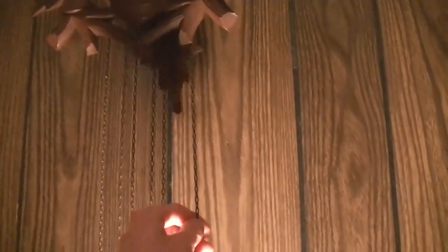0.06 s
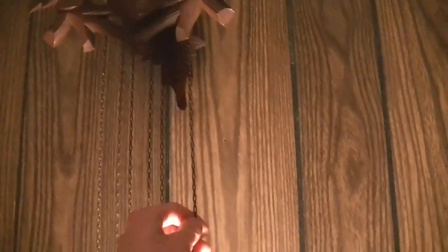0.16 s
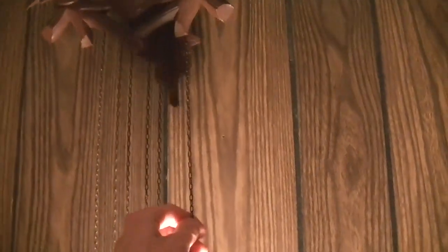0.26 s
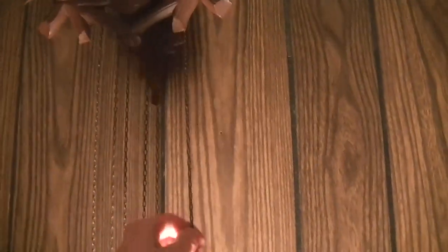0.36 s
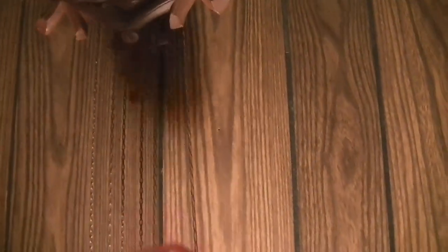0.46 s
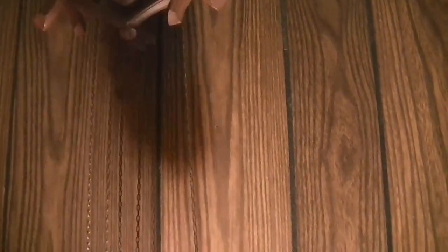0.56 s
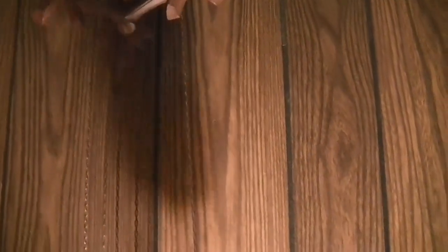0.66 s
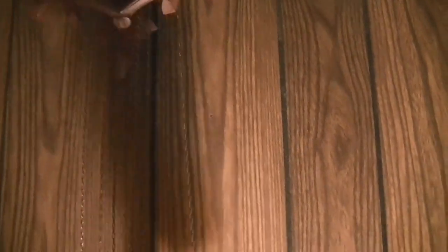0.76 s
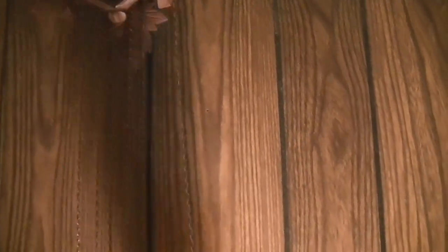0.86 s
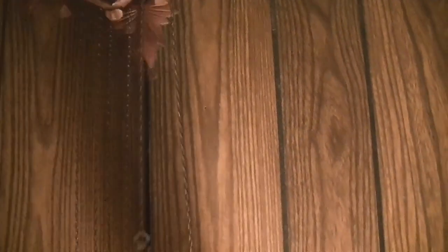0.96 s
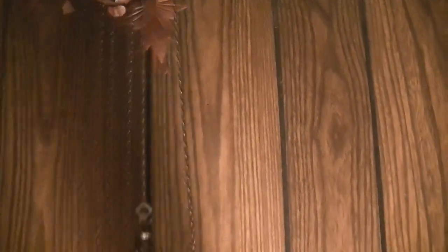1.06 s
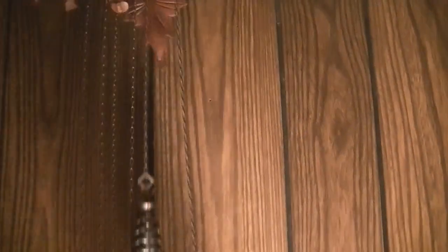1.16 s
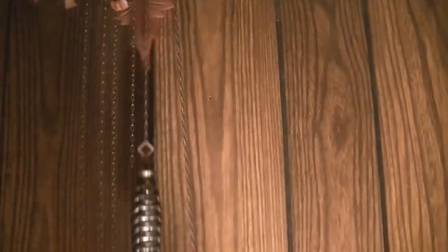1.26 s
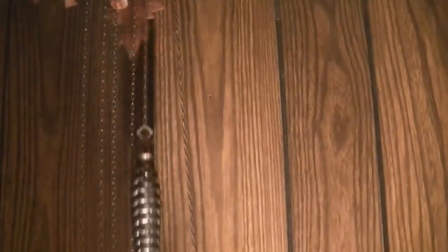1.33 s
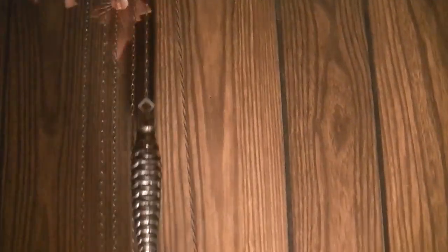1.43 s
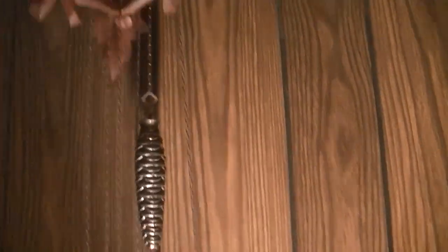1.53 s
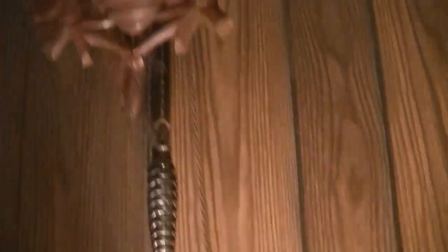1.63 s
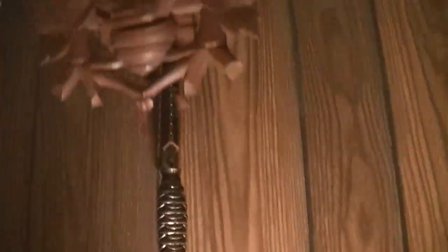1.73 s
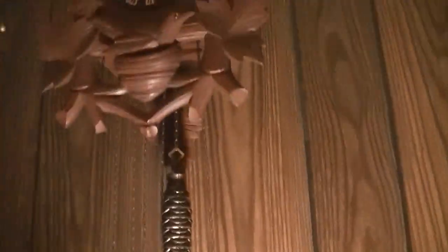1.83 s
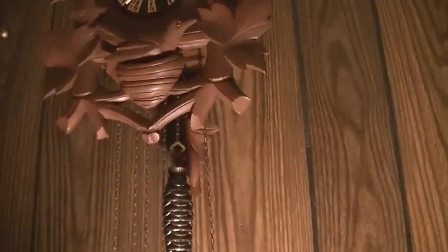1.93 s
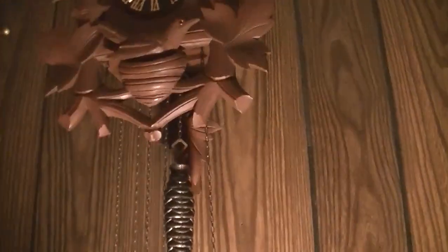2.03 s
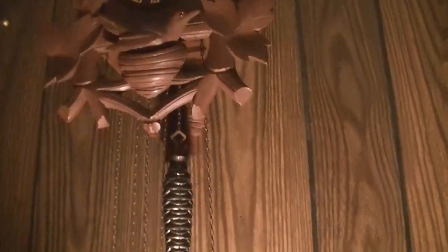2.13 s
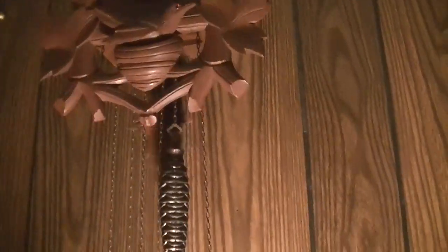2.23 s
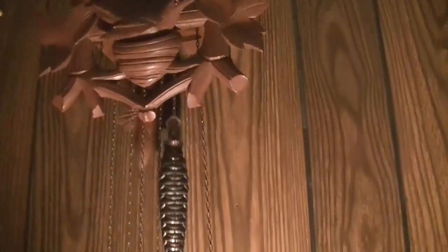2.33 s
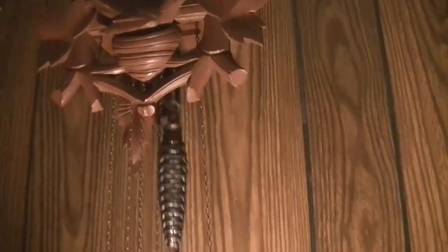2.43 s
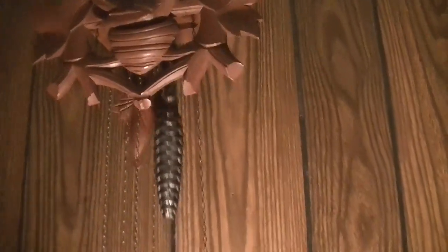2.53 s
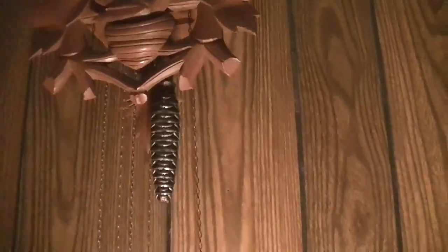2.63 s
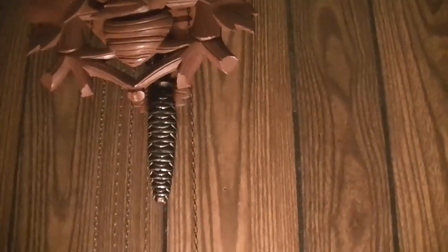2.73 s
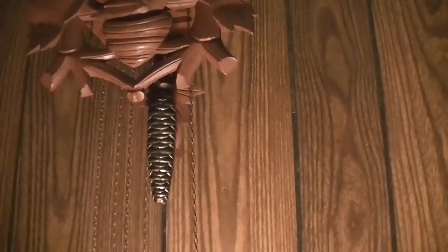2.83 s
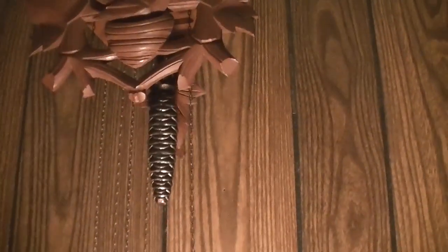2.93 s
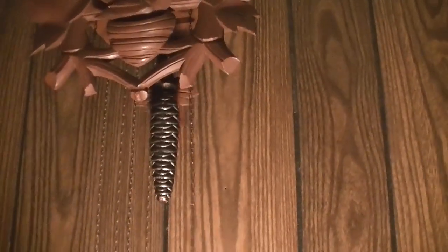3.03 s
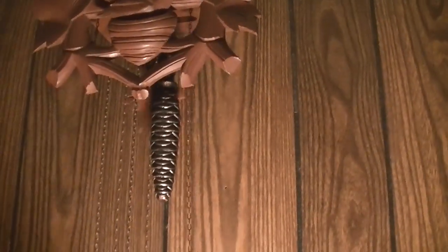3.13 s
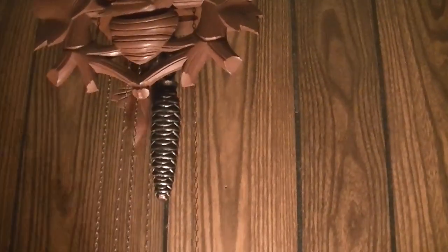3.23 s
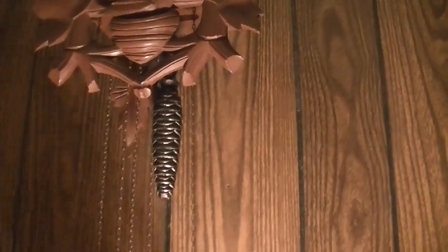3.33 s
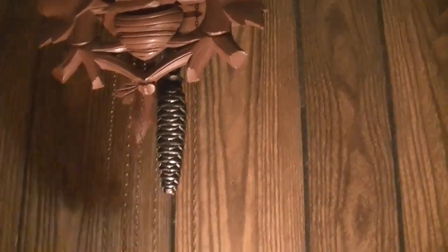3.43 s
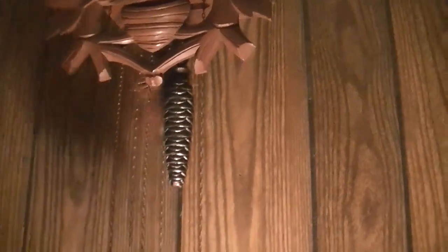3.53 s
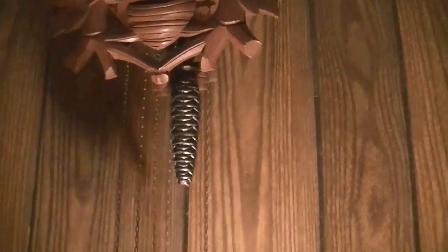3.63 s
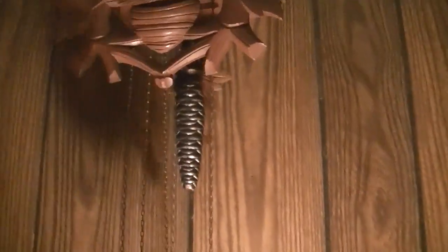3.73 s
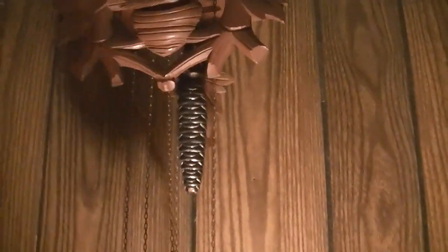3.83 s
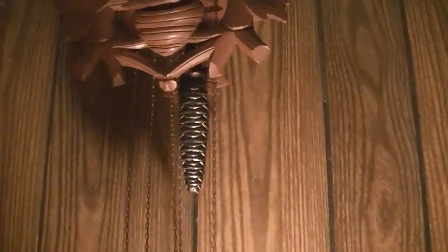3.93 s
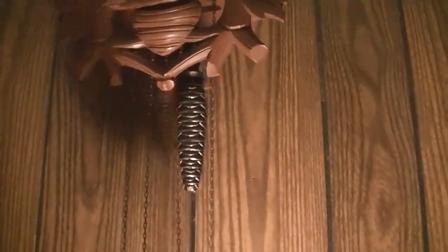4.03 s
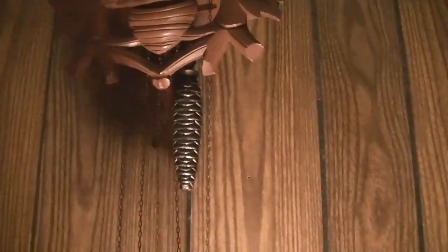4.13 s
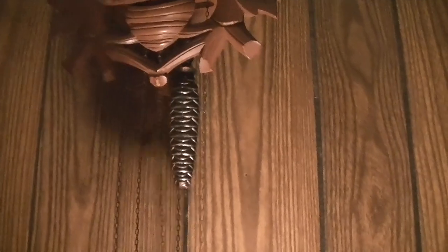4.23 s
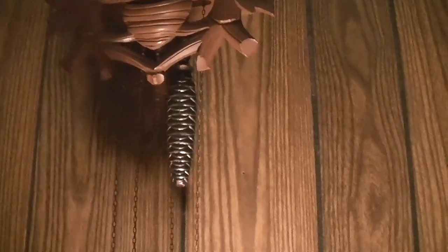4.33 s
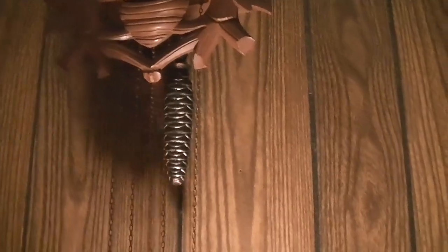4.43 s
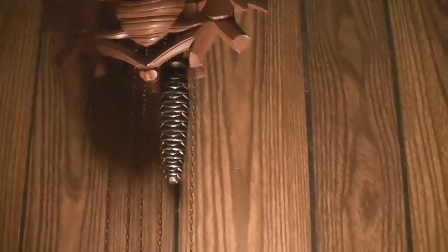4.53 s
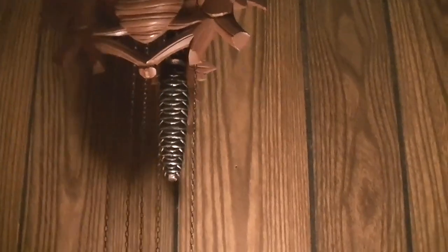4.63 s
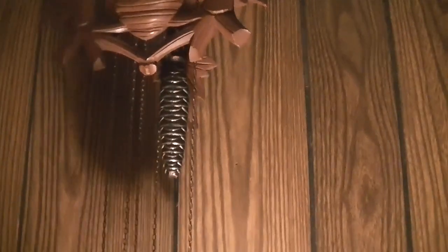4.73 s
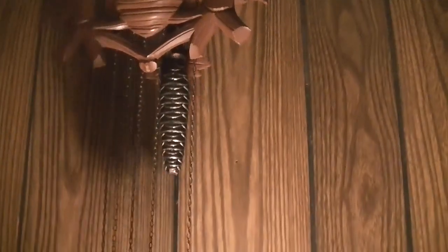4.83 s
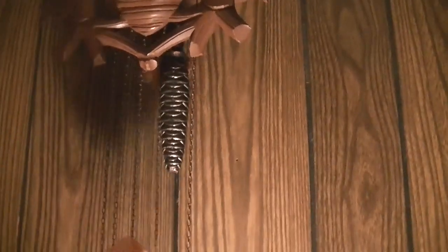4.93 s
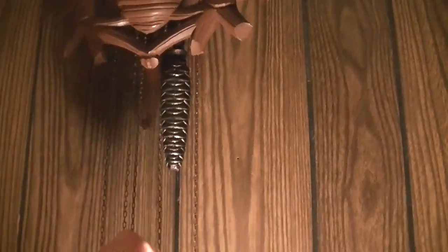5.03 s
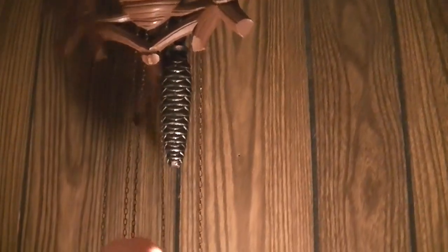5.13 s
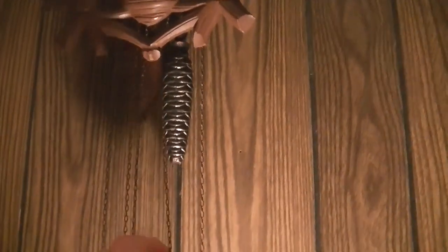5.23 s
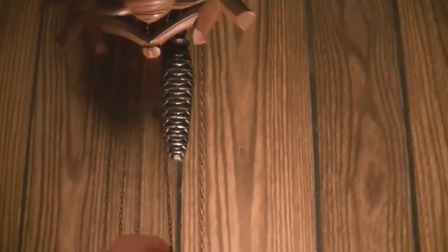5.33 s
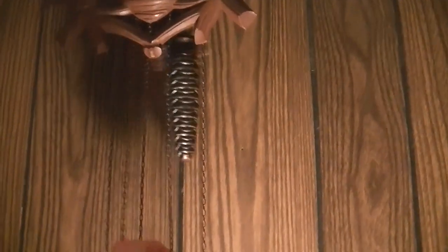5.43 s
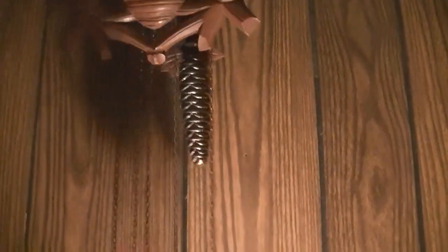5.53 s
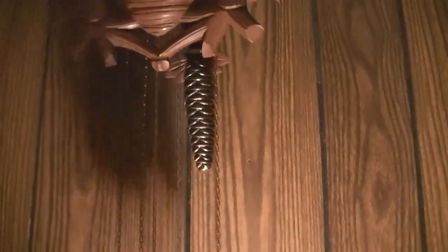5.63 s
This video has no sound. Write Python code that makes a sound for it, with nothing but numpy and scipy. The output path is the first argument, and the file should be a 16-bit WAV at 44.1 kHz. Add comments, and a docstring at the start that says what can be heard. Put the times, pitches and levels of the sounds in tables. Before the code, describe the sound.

Close to a wooden cuckoo clock in a small panelled room, a hand-pulled chain runs over a ratchet in a dense, bright clatter for about a second and a half. A brief slower pull follows, then woody bumps of the weight and one crisp metal clack. The clock ticks about twice a second over soft room noise, until a second chain starts clattering at the end.

```python
"""A ratchet clatters as a wooden cuckoo clock's weight chains are pulled up by hand: the pawl snaps over
its teeth and rings the case (dense decaying modes plus a short sine), while links scrape in tiny grains.
The first weight bumps the case, the loose chain clacks, then a second chain starts: shaped modal blows.
The clock ticks on in a small panelled room with noisy air and hum; a camera's lens motor pips faintly."""
import sys
import numpy as np
from scipy import signal
from scipy.fft import rfft, irfft, next_fast_len
from scipy.io import wavfile

SR = 44100
rng = np.random.default_rng(int(sys.argv[2]) if len(sys.argv) > 2 else 0)


def wrap_up_sound(samples):
    """Save the sound to the file named by the first command line argument, as 16-bit audio."""
    columns = np.atleast_2d(samples).T
    # keep every value between -1 and 1, then stretch to whole-number steps
    tamed = np.clip(columns, -1, 1)
    steps = np.round(tamed * 32767).astype(np.int16)
    wavfile.write(sys.argv[1], SR, steps)


N = 250488

BLOW_SAMPLES = 4096
HZ = np.fft.rfftfreq(BLOW_SAMPLES, 1 / SR)
USUAL_TEETH_PER_S = 50

# resonances of case and movement, before each user's weighting: centre_hz, width_hz, lift_db
CASE_MODES = [(407.6, 26, 14), (890, 74, 7.5), (1024, 48, 7), (1219, 58, 8), (1350, 196, 6),
              (1827, 184, 14.5), (2110, 60, 3), (2350, 226, 9.5), (2745, 40, 9.5), (2920, 120, 10),
              (3163, 128, 12), (3416, 243, 14), (3568, 43, 11.5), (4420, 410, 9.5), (5280, 720, 12),
              (5670, 330, -1), (6046, 234, 9.5), (6230, 130, 6), (7240, 120, 9.5), (12000, 150, 6),
              (12900, 380, 12)]
# chain speed in two pulls on the first chain and one on the second: time_s, teeth_per_s
LONG_PULL = [(0.314, 16.3), (0.387, 34.7), (0.463, 73.3), (0.548, 75.2), (0.602, 57.7), (0.658, 75.0),
             (0.758, 72.8), (0.802, 59.9), (0.857, 74.5), (0.971, 59.0), (1.022, 39.5), (1.238, 59.5),
             (1.3, 39.1), (1.39, 59.2), (1.496, 52.7), (1.608, 20.4), (1.734, 45.8), (1.868, 36.3),
             (1.926, 17.7)]
LAST_PULL = [(2.314, 12.1), (2.42, 22.0), (2.518, 54.5), (2.612, 23.1)]
SECOND_CHAIN_PULL = [(5.523, 26.1), (5.599, 50.6), (5.679, 64.4)]


def amp(db):
    """Decibels to gain."""
    return 10 ** (np.asarray(db) / 20)


def unit(x):
    """Scale to rms 1."""
    return x / np.sqrt(np.mean(x ** 2) + 1e-20)


def along(points, hz):
    """Interpolate (hz, value) points on a log frequency axis."""
    point_hz, value = np.transpose(points)
    return np.interp(np.log(hz + 1), np.log(point_hz + 1), value)


def filtered(x, response):
    """Multiply the spectrum of x by a response of frequency."""
    m = next_fast_len(N + SR // 2)
    spectrum = rfft(x, m) * response(np.fft.rfftfreq(m, 1 / SR))
    return irfft(spectrum, m)[..., :N]


def lifts(modes, hz):
    """Sum of resonance peaks as a dB curve."""
    return sum(db / (1 + (2 * (hz - centre) / width) ** 2) for centre, width, db in modes)


def add(track, start_s, sound):
    """Mix a sound into the track in place."""
    part = track[round(start_s * SR):][:len(sound)]
    part += sound[:len(part)]


def chance():
    """Random strengths for the dense modes of one blow."""
    return rng.standard_normal(BLOW_SAMPLES)


def unit_energy(sound):
    """Scale to the energy of rms 1 lasting 10 ms."""
    return sound / np.linalg.norm(sound) * np.sqrt(SR / 100)


def minimum_phase(colour_db):
    """Causal impulse response of a dB curve, by folding its cepstrum."""
    cepstrum = irfft(np.log(amp(colour_db)))
    cepstrum[1:BLOW_SAMPLES // 2] *= 2
    cepstrum[BLOW_SAMPLES // 2 + 1:] = 0
    return irfft(np.exp(rfft(cepstrum)))


def blow(noise, colour_db, decay, bloom_cycles, swell_s):
    """Struck body: dense modes swell over some cycles and die band by band; decay is (hz, t60_s)."""
    t = np.arange(BLOW_SAMPLES) / SR
    centres_hz = np.geomspace(350, 14000, 9)
    masks = np.array([np.interp(np.log(HZ + 1), np.log(centres_hz), row) for row in np.eye(len(centres_hz))])
    bands = irfft(rfft(noise) * masks)
    life = amp(-60 * t / along(decay, centres_hz)[:, None])
    life *= 1 - np.exp(-t * centres_hz[:, None] / bloom_cycles)
    life *= 1 - np.exp(-t / swell_s)  # the contact itself takes a moment
    life /= np.linalg.norm(life, axis=1, keepdims=True)
    burst = np.sum(bands * life, axis=0)
    return unit_energy(signal.fftconvolve(burst, minimum_phase(colour_db))[:BLOW_SAMPLES])


def air():
    """Steady, nearly mono room noise with one hollow resonance, and hum partials that wander in phase."""
    # spectrum of the room noise: hz, db_per_hz (relative)
    air_colour = [(20, -54), (60, -20), (150, -23), (228, -10.5), (324, -4.5), (486, -5), (620, -3.5),
                  (980, -5.5), (1390, -8.5), (1780, -11), (3130, -13.5), (7000, -18), (15800, -25.5)]
    # hum partials: hz, level_db
    hum_partials = [(60, -82.5), (240, -71.5), (356, -71.5), (585, -73)]
    air_db, side_db = -55, -10.5
    hollow = [(422, 56, 6.0)]
    mid, side = filtered(rng.standard_normal((2, N)), lambda hz: amp(along(air_colour, hz) + lifts(hollow, hz)))
    noise = unit(mid) + amp(side_db) * unit(side) * np.array([[1], [-1]])
    t = np.arange(N) / SR
    hum = np.zeros(N)
    for hz, db in hum_partials:
        drift = np.cumsum(rng.standard_normal(N)) / np.sqrt(SR)
        hum += amp(db) * np.sqrt(2) * np.sin(2 * np.pi * hz * (t + 0.00194 * drift))
    return amp(air_db) * noise + hum


def ticks():
    """Teeth land on the anchor's two pallets in turn; each rebounds twice with a thin high ring."""
    # escapement beats: start_s, level_db
    beats = [(0.0403, -34), (0.493, -48), (.945, -46), (1.395, -29), (1.851, -29), (2.297, -33),
             (2.763, -33), (3.205, -34.5), (3.668, -34), (4.1147, -34.5), (4.5733, -33), (5.0161, -34),
             (5.462, -52)]
    # colours of the two pallets: hz, db_per_hz (relative)
    tick_colour = [(120, -28), (200, -20), (371, -4), (665, -12), (923, 8), (1110, -18), (1840, -2.5),
                   (2250, -8), (2380, -6.5), (3120, -6), (4410, 5.5), (6710, -11), (8500, -8), (10000, -3),
                   (15500, -36)]
    tock_colour = [(120, -49), (200, -18), (392, -6), (677, -13), (1190, -4), (1480, -14), (1810, -3.5),
                   (2250, -11), (2420, -10), (4330, -2), (6130, -15), (7350, -7), (8820, -18), (10600, -6),
                   (15500, -32)]
    # resonances of the anchor: centre_hz, width_hz, lift_db
    anchor_modes = [(950, 55, -7), (1180, 46, 12), (1890, 89, 5), (2450, 65, 13.5), (2700, 80, 3),
                    (3396, 160, 11.5), (4460, 390, 3), (4840, 450, 6), (6970, 840, 6.5)]
    track = np.zeros(N)
    anchor_db = lifts(anchor_modes, HZ) + lifts([(9800, 1400, -20)], HZ)
    rebound_colour_db = along([(2000, -29.5), (6000, -9.5), (8700, -23), (9900, 2.0), (10600, -5),
                               (11200, -18), (12000, -10), (13000, -24), (16000, -42)], HZ)
    landing_decay = [(900, 0.038), (3000, 0.091), (4600, 0.029), (10000, 0.069)]
    rebounds = [[(.0065, -6), (.013, -15.5)], [(.009, -9), (.0155, -19)]]  # per pallet: delay_s, level_db
    for beat, (start_s, db) in enumerate(beats):
        pallet = beat % 2
        tone_db = along([tick_colour, tock_colour][pallet], HZ) + anchor_db
        landing = blow(chance(), tone_db, landing_decay, bloom_cycles=2.6, swell_s=0.00016)
        add(track, start_s, amp(db) * landing)
        for delay_s, rebound_db in rebounds[pallet]:
            rebound = blow(chance(), rebound_colour_db, [(10000, 0.013)], bloom_cycles=2.4, swell_s=0.00035)
            add(track, start_s + delay_s, amp(db + rebound_db) * rebound)
    return track


def nudges(count):
    """Faint chance touches of the hanging chains: start_s, level_db, tilt_db_per_octave."""
    level_db, tilt_db = -51.5, -3.5
    return [(rng.random() * N / SR, level_db + rng.normal(0, 2), tilt_db + rng.normal(0, 1.3))
            for _ in range(count)]


def bumps():
    """Dull knocks of iron and chain excite the wooden base."""
    # weight and chain bump the wood: start_s, level_db, tilt_db_per_octave
    knocks = [(0.151, -39.5, 4), (0.158, -38.5, 0), (1.644, -39, -4), (2.6743, -24.5, -2.5),
              (2.6765, -25.5, 7.5), (2.691, -39, 7), (2.716, -32, -3.5), (2.746, -34.5, 0.5),
              (2.8192, -24.5, 2.5), (2.842, -40, -0.5), (3.541, -47, -11), (3.614, -48.5, -8.5),
              (3.908, -47, -5), (3.986, -44, -0.5), (4.023, -42.5, -7.5), (4.06, -48, 1), (4.099, -41, -4),
              (4.32, -51.5, -5), (4.705, -45.5, -8), (5.058, -47.5, 2.5), (5.418, -46, -5),
              (5.435, -44.5, -0.5)]
    # colour of a knock: hz, db_per_hz (relative)
    knock_colour = [(88, -34), (150, -34), (366, -8), (530, -21), (1200, 1.5), (1540, -6.5), (1830, -1),
                    (2180, -2.5), (2920, -2.5), (3910, -10.5), (5760, -9.5), (8170, -19), (13500, -28),
                    (15500, -42)]
    # resonances of the wooden base: centre_hz, width_hz, lift_db
    base_modes = [(410, 50, 7), (635, 86, 5.5), (884, 160, 9), (1170, 90, -1), (1540, 89, 5.5),
                  (1870, 110, 0.5), (1930, 190, 6.5), (3030, 220, 2.5), (3530, 81, 9), (4540, 160, 10)]
    decay = [(500, 0.063), (1800, 0.075), (5000, 0.034), (12000, 0.028)]
    track = np.zeros(N)
    octaves = np.log2(np.maximum(HZ, 300) / 1000)
    for start_s, db, tilt_db in knocks + nudges(count=12):
        tone_db = along(knock_colour, HZ) + lifts(base_modes, HZ) + tilt_db * octaves
        add(track, start_s, amp(db) * blow(chance(), tone_db, decay, bloom_cycles=1.6, swell_s=0.00028))
    return track


def speed(pull):
    """Teeth per second at every sample; zero outside the pull."""
    time_s, teeth_per_s = np.transpose(pull)
    return np.interp(np.arange(N) / SR, time_s, teeth_per_s, left=0, right=0)


def snaps(pull, level_db, pawl_hz):
    """One snap per passing tooth: start_s, level_db, wood_db, steel_db, pawl_db, pawl_hz."""
    # tug of the hand in the long pull, over a steady pull: time_s, level_db
    tug = [(0.314, 0), (0.43, 0.5), (0.49, 1.1), (0.57, -1.5), (0.65, -0.5), (0.69, 0.6), (0.78, -0.5),
           (0.88, 1.5), (0.98, -1), (1.09, 0.2), (1.17, 0.6), (1.35, -1), (1.43, 0.8), (1.56, 0.4),
           (1.70, 0.6), (1.78, 1.9), (1.93, -1)]
    snap_db_per_octave = 1.4  # a faster chain snaps harder
    steel_db_per_octave = -0.6  # the treble grows less with speed than the body
    pawl_db_per_octave = -1.2  # the pawl's spring sets its ring, which stands out in slow snaps
    wood_db_per_s, pawl_db_per_s = 1.8, -2.5  # snaps turn woodier and ring less as a pull goes on
    snap_scatter_db, wood_scatter_db, steel_scatter_db = 0.78, 1.7, 1.5
    pawl_pitch_scatter = 0.04  # relative
    link_db = 0.5  # flat and upright links take turns: weaker, then stronger ring
    rate = speed(pull)
    teeth = np.cumsum(rate) / SR
    tooth = np.arange(np.ceil(teeth[-1]))
    at = np.searchsorted(teeth, tooth, side="right")
    start_s = at / SR
    octaves = np.log2(rate[at] / USUAL_TEETH_PER_S)
    past_middle_s = start_s - start_s.mean()
    force, wood, steel, pitch = rng.standard_normal((len(at), 4)).T
    tug_db = np.interp(start_s, *np.transpose(tug), right=0)
    db = level_db + tug_db + snap_db_per_octave * octaves + snap_scatter_db * force
    wood_db = wood_db_per_s * past_middle_s + wood_scatter_db * wood
    steel_db = steel_db_per_octave * octaves + steel_scatter_db * steel
    pawl_db = pawl_db_per_octave * octaves + pawl_db_per_s * past_middle_s - link_db * (-1) ** tooth
    ring_hz = pawl_hz * np.exp(pawl_pitch_scatter * pitch)
    return list(zip(start_s, db, wood_db, steel_db, pawl_db, ring_hz))


def pawl(ring_hz, t60_s, swell_s):
    """The pawl's own short ring: a decaying sine that starts sharp and settles in pitch."""
    bend, settle_s = 0.09, 0.0013  # bend: relative
    t = np.arange(BLOW_SAMPLES) / SR
    cycles = np.cumsum(ring_hz * (1 + bend * np.exp(-t / settle_s))) / SR
    tone = np.sin(2 * np.pi * (cycles + rng.random()))
    return unit_energy(tone * amp(-60 * t / t60_s) * (1 - np.exp(-t / swell_s)))


def ratchet(drops, body_db, bloom_cycles, alike, ring_db, ring_t60_s):
    """Each tooth drops the pawl onto the wheel; successive snaps are alike and change as it turns."""
    # decay of a blow in the case: hz, t60_s
    case_decay = [(400, 0.15), (1000, 0.091), (1900, 0.013), (3000, 0.051), (5500, 0.027), (12000, 0.024)]
    track, modes = np.zeros(N), chance()
    alike = np.clip(alike, 0, .98)  # correlation of successive snaps
    wood = along([(1700, 1), (2300, 0)], HZ)
    steel = along([(6000, 0), (8000, 1)], HZ)
    for start_s, db, wood_db, steel_db, pawl_db, pawl_hz in drops:
        modes = alike * modes + np.sqrt(1 - alike ** 2) * chance()
        tone_db = body_db + wood_db * wood + steel_db * steel
        case = blow(modes, tone_db, case_decay, bloom_cycles, swell_s=0.00046)
        ring = amp(ring_db + pawl_db) * pawl(pawl_hz, ring_t60_s, swell_s=0.0023)
        add(track, start_s, amp(db) * (case + ring))
    return track


def sliding(pull, level_db):
    """Strength of the link noise: grows with chain speed and lingers after the pull."""
    db_per_octave, fade_s = 3.5, 0.032
    drive = (speed(pull) / USUAL_TEETH_PER_S) ** (db_per_octave / (20 * np.log10(2)))
    keep = np.exp(-1 / (fade_s * SR))
    return amp(level_db) * signal.lfilter([1 - keep], [1, -keep], drive)


def rustling():
    """Strength of the slack chain's rustle: each swing swells and dies away."""
    # swings of the slack chain: peak_s, level_db, rise_s per 20 dB, fall_s per 20 dB
    swings = [(0.33, -45.5, 0.19, 0.24), (2.26, -57, 0.97, 0.34), (2.79, -43.5, 0.27, 0.15),
              (3.96, -59, 0.56, 0.7), (4.76, -67.5, 0.46, 0.4), (5.05, -58.5, 0.24, 0.29)]
    t = np.arange(N) / SR
    return sum(amp(db - 20 * np.maximum((peak_s - t) / rise_s, (t - peak_s) / fall_s))
               for peak_s, db, rise_s, fall_s in swings)


def grains(rate_hz):
    """Sparse random impulses of random strength."""
    return rng.standard_normal(N) * (rng.random(N) < rate_hz / SR)


def slide(pulled_hiss_db, slack_hiss_db):
    """Links scrape along in tiny uneven grains that ring the case and hiss on the wheel."""
    pulled = sliding(LONG_PULL, level_db=-45.0)
    pulled += sliding(LAST_PULL, level_db=-49)
    pulled += sliding(SECOND_CHAIN_PULL, level_db=-48)
    slack = rustling()
    wood_colour = [(40, -10), (150, -24.5), (300, -6.5), (900, 12.5), (1600, -1.0), (3000, 2.5), (12000, -46)]
    metal_colour = [(300, -40), (1500, 8.5), (3000, -6.0), (5000, 0.5), (7000, -6.0), (11000, -9), (15000, -33)]
    wood = filtered(grains(700), lambda hz: amp(along(wood_colour, hz) + 1.26 * lifts(CASE_MODES, hz)))
    metal = filtered(grains(3000), lambda hz: amp(along(metal_colour, hz) + 0.06 * lifts(CASE_MODES, hz)))
    hiss = amp(pulled_hiss_db) * pulled + amp(slack_hiss_db) * slack
    return (pulled + slack) * unit(wood) + hiss * unit(metal)


def tings():
    """A swinging link touches its neighbour and rings briefly around one resonance."""
    # single links ring: start_s, level_db, pitch_hz
    touches = [(2.202, -50, 3780), (4.703, -55.5, 6900), (4.95, -59, 10400), (5.243, -51, 3470),
               (5.461, -57, 5600), (5.487, -58, 5770)]
    track = np.zeros(N)
    for start_s, db, hz in touches:
        tone_db = lifts([(hz, 700, 30)], HZ)
        add(track, start_s, amp(db) * blow(chance(), tone_db, [(6000, 0.091)], bloom_cycles=3.7, swell_s=.001))
    return track


def clacks():
    """Metal of the loose chain strikes metal and chatters to rest."""
    # hard contacts: start_s, level_db
    contacts = [(3.609, -50), (3.818, -54), (3.8406, -18), (3.8436, -24), (3.8457, -22), (3.8493, -22.5),
                (3.8544, -27.5), (3.8695, -38), (5.487, -50)]
    # colour of a contact: hz, db_per_hz (relative)
    contact_colour = [(120, -72), (200, -37), (783, -16.5), (1170, -21), (1280, -17.5), (1620, -18),
                      (1980, -14.5), (2420, -17.5), (2960, -17.5), (3750, -9), (5390, -12), (6590, 3),
                      (7620, -7), (14200, -16), (15500, -25)]
    # decay of a contact: hz, t60_s
    contact_decay = [(800, 0.14), (2500, 0.052), (6500, 0.013), (14000, 0.015)]
    chain_modes = [(2010, 74, 11.0), (2360, 80, 11.0), (6000, 140, 4.9),
                   (7350, 160, 2.9), (7800, 130, 6.5), (8200, 120, 4.5)]
    track = np.zeros(N)
    tone_db = along(contact_colour, HZ) + lifts(chain_modes, HZ)
    for start_s, db in contacts:
        contact = blow(chance(), tone_db, contact_decay, bloom_cycles=0.98, swell_s=0.00023)
        add(track, start_s, amp(db) * contact)
    return track


def lens(pip_hz, pip_db):
    """While it hunts, the focus motor steps at most once a frame; each step is a short soft sine pip."""
    # hunts for focus: start_s, end_s
    hunts = [(3.974, 4.52), (4.675, 4.95)]
    frames_per_s, step_chance, pip_s = 30, 0.5, 0.022
    track, t = np.zeros(N), np.arange(round(pip_s * SR)) / SR
    frames_s = np.concatenate([np.arange(start, end, 1 / frames_per_s) for start, end in hunts])
    for frame_s in frames_s:
        pitch_hz = pip_hz * (1 + 0.0052 * rng.normal())
        pip = np.hanning(len(t)) * np.sin(2 * np.pi * pitch_hz * t)
        steps = rng.random() < step_chance
        add(track, frame_s - t[-1] / 2, amp(pip_db) * pip * steps)
    return track


def ports(x):
    """Sound bends round the camera body and reaches its two microphone ports slightly differently."""
    # difference between the ports: hz, level_db
    port_difference = [(100, -38), (500, -38), (1200, -95), (2000, -39), (2700, -25), (4400, -21),
                       (6000, -28.5), (8700, -22), (12500, -35)]
    delay_s = .0004
    side = filtered(x, lambda hz: amp(along(port_difference, hz)) * np.exp(-2j * np.pi * hz * delay_s))
    return np.array([x + side, x - side])


def room(x, wet_db, side_db, wall_s):
    """Decaying noise tails, weak until the far walls answer; they crossfade as the camera moves."""
    # reverberation of the room: hz, t60_s
    room_decay = [(200, 0.51), (1000, 0.099), (4000, 0.14), (12000, 0.085)]
    out, t = np.zeros((2, N)), np.arange(N) / SR
    for centre_s in np.arange(0, 6.1, .5):
        hz, age_s, z = signal.stft(rng.standard_normal((2, SR // 3)), SR, nperseg=256)
        gap = np.where(age_s < wall_s, .3 * age_s / (wall_s * 1.01), 1)
        life = amp(-60 * age_s / along(room_decay, hz)[:, None]) * gap
        mid, side = signal.istft(z * life, SR, nperseg=256)[1]
        tail = np.array([mid + amp(side_db) * side, mid - amp(side_db) * side]) / np.linalg.norm(mid)
        share = np.sqrt(np.clip(1 - 2 * abs(t - centre_s), 0, 1))  # equal-power crossfade
        out += signal.fftconvolve((x * share)[None], tail, axes=1)[:, :N]
    return amp(wet_db) * out


def scene():
    """The clock, close and straight ahead, in its room; the loose chain hangs nearest and sounds driest."""
    # colour of each chain's ratchet: hz, db_per_hz (relative)
    first_colour = [(40, -30), (150, -26.5), (260, -11), (550, -13.5), (800, 2), (1550, -4.5), (2600, -1),
                    (4000, -9), (5500, -4.5), (8500, -7), (10200, 2), (13000, -11), (15700, -15)]
    second_colour = [(40, -24), (150, -23), (300, -4), (550, -11.5), (800, 4), (1800, 1.5), (2600, -3),
                     (4000, -5), (6000, -7), (7700, 0), (9000, -3.5), (11800, -1), (15700, -18)]
    # resonances of the second chain's wheel: centre_hz, width_hz, lift_db
    second_wheel_modes = [(430, 100, 13), (1816, 270, 12), (2700, 180, 8.5), (3320, 300, 7),
                          (4520, 190, 12)]
    case_db = lifts(CASE_MODES, HZ)
    first_db = along(first_colour, HZ) + case_db
    second_db = along(second_colour, HZ) + 0.32 * case_db + lifts(second_wheel_modes, HZ)
    first_snaps = snaps(LONG_PULL, level_db=-23.0, pawl_hz=2555)
    first_snaps += snaps(LAST_PULL, level_db=-22.5, pawl_hz=2570)
    second_snaps = snaps(SECOND_CHAIN_PULL, level_db=-27.5, pawl_hz=2880)
    first = ratchet(first_snaps, first_db, bloom_cycles=1.8, alike=0.36, ring_db=-4.0, ring_t60_s=0.0098)
    second = ratchet(second_snaps, second_db, bloom_cycles=2.1, alike=0.42, ring_db=-27, ring_t60_s=0.0052)
    clock = first + second + ticks() + bumps()
    clock += slide(pulled_hiss_db=3.8, slack_hiss_db=-0.5) + tings()
    loose = clacks()
    # the clack's sharp top beams forward, so the walls hear it duller
    spill_colour = [(1000, 0), (3500, -2), (6500, -4.5), (10000, 1.5)]
    spill = filtered(loose, lambda hz: amp(along(spill_colour, hz)))
    walls = room(clock + spill, wet_db=-14.0, side_db=-60, wall_s=0.017)
    return ports(clock + loose) + walls + air() + lens(pip_hz=2930, pip_db=-53.5)


def record(dry):
    """Band limit: nothing passes from top_hz up."""
    top_hz = 15950
    return filtered(dry, lambda hz: hz < top_hz)


dry = scene()
out = record(dry)
wrap_up_sound(out)
```